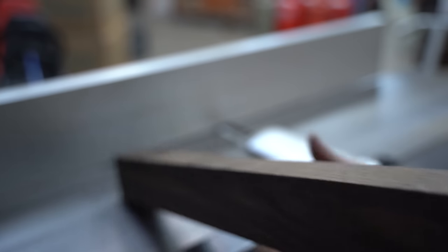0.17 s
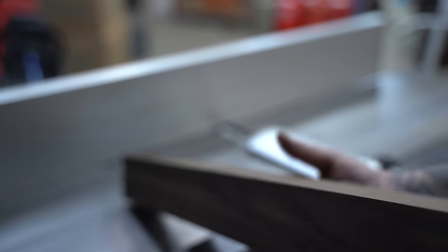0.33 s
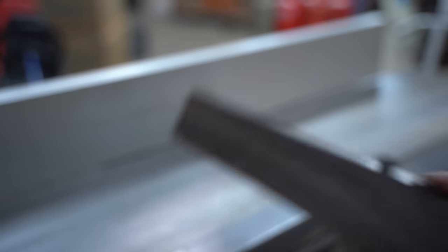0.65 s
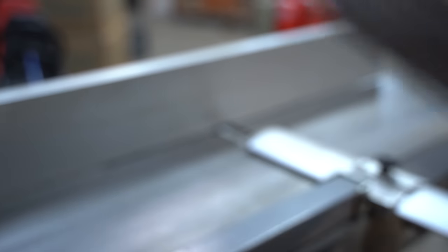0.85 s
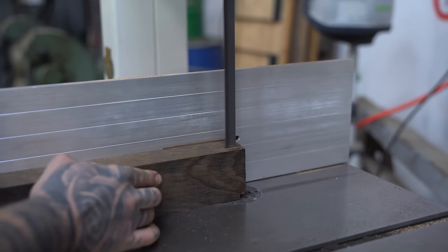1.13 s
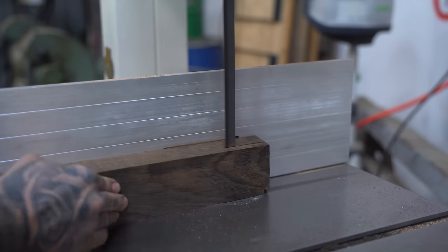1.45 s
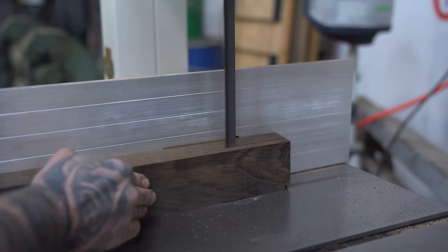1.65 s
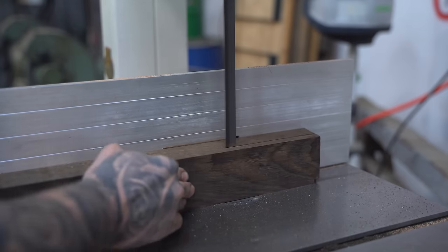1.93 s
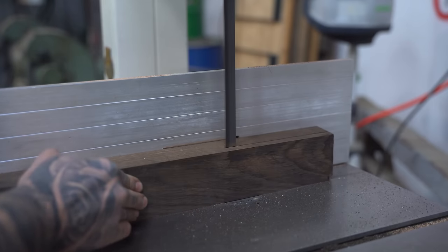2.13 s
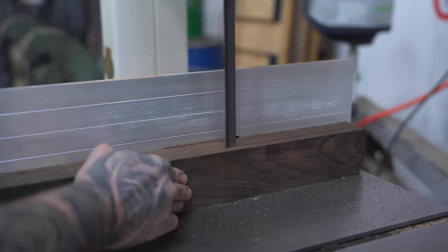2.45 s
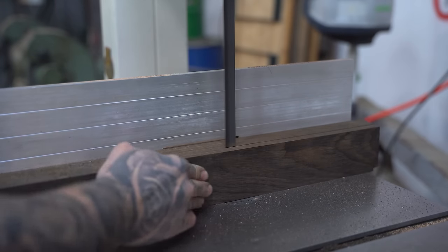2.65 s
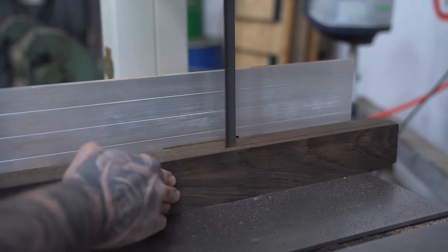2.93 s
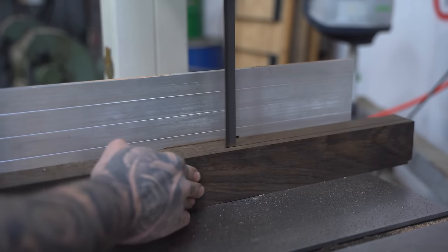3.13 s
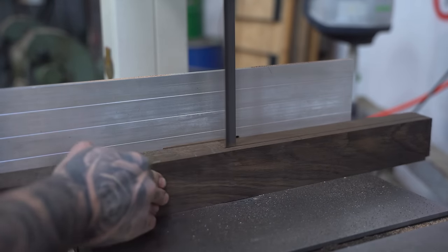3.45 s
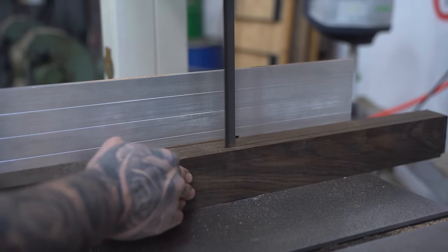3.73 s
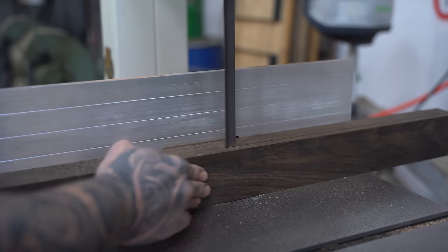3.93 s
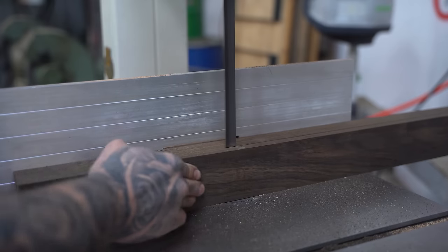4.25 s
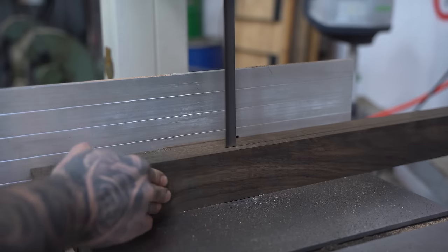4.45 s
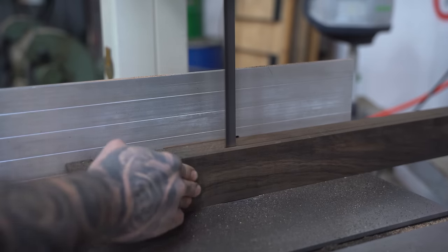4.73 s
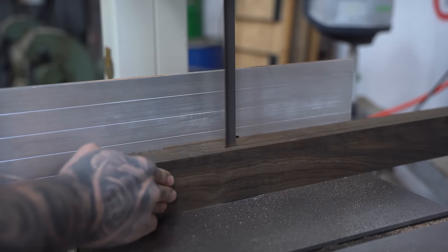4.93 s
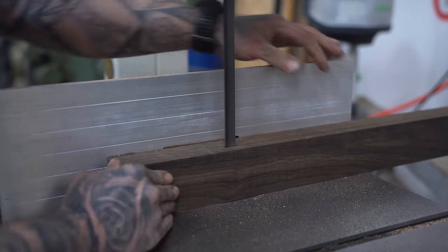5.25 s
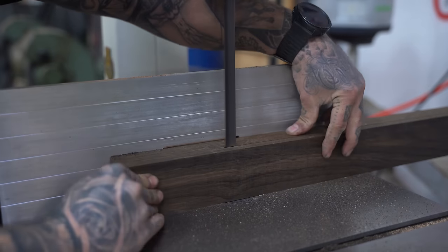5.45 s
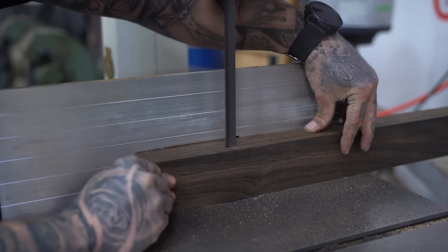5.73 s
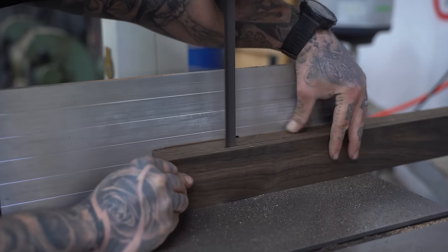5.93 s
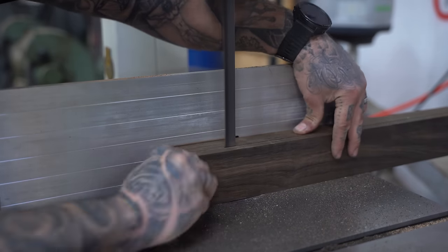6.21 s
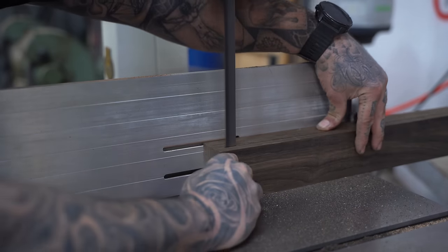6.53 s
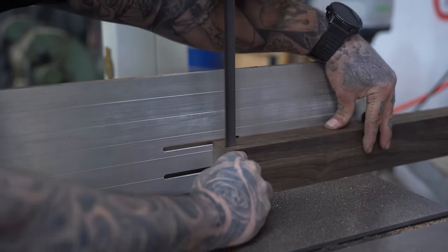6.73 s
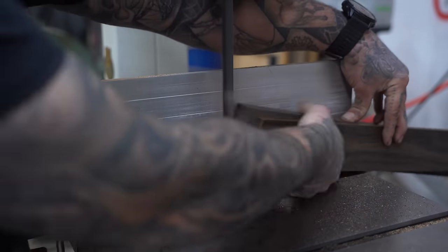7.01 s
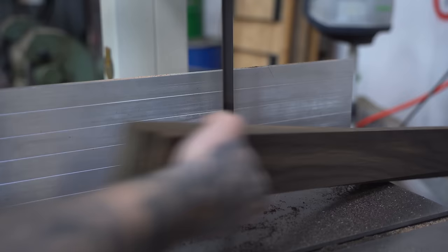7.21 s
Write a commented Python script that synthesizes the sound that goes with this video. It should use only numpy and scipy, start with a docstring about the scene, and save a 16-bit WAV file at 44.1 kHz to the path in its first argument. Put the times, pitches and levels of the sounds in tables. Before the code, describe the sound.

A jointer idles in a small workshop, a steady rush of air with a thin bearing whine, slightly to the left. At about 1.1 seconds the sound switches abruptly to a louder bandsaw ripping a hardwood board, close and roughly centred. The teeth make a bright, sizzling rasp with a fast flutter, ringing blade tones and a woody resonance underneath. Deeper bites squeal and growl from about 1.2 to 1.9 seconds, near 4.2, and again from 5.8 to 6.5. The rasp dips briefly between pushes, roughly every half second, often with a high metallic chirp; clear dips come near 1.5, 2.1, 2.7, 3.3 and 4.4 seconds, with a longer hesitation around 5.2 to 5.4. At about 6.8 seconds the cut is through, and the saw runs free with a quieter hiss and faint whine until the end, around 7.4 seconds.

```python
"""Bandsaw ripping hardwood

In a small workshop a jointer idles for a second; then, abruptly, a bandsaw is ripping a board.
The teeth rasp through the fibres and set the blade ringing: a light bite sizzles, a deep one squeals
and growls. Whenever the hand stops feeding, the rasp drops, often with a chirp from the blade.
Near the end the cut is through and the saw runs free."""
import sys
import numpy as np
from scipy import signal
from scipy.fft import rfft, irfft, next_fast_len
from scipy.io import wavfile
from scipy.ndimage import uniform_filter1d

SR = 44100
rng = np.random.default_rng(int(sys.argv[2]) if len(sys.argv) > 2 else 0)


def file_out(sig):
    """Save sig as 16-bit WAV at sys.argv[1]."""
    # one column per channel
    cols = np.atleast_2d(sig).T
    # limit, then scale
    lim = np.clip(cols, -1, 1)
    pcm = np.round(lim * 32767).astype(np.int16)
    wavfile.write(sys.argv[1], SR, pcm)


N = 325105
TIME = np.arange(N) / SR
SAW_START_S = 1.147
FREE_TOOTH_HZ, LOADED_TOOTH_HZ, PULLEY_HZ = 923, 892, 35.33

# The jointer's rush of air. Each row: frequency in Hz, relative level in dB.
JOINTER_AIR_COLOUR = [(30, -46), (75, -30), (100, -20), (150, -16), (310, -10), (600, -14), (1070, -16.5),
                      (1550, -17), (1800, -22), (3060, -21.5), (4000, -19), (5170, -19.5), (6210, -27),
                      (16000, -41)]
# Its stereo image. Each row: frequency in Hz, left-right likeness from 0 to 1.
JOINTER_STEREO = [(100, 1), (300, 1), (700, 0.86), (1400, 0.42), (3000, 0.21), (6000, 0.12), (15000, 0.17)]
# Its hood resonance swells. Each row: time in seconds, relative level in dB.
HOOD_SWELL = [(0.2, -68), (0.6, -55.5)]
# Its bearing whine. Each row: pitch in Hz, relative level in dB.
JOINTER_WHINES = [(1986, -66), (2019, -82), (2692, -65.5), (3973, -58), (4963, -69.5), (7940, -76)]
# The hand pushes the board on, then slackens. Each row: start, end, lean-in and ease-off in seconds,
# then in dB the feed drop in the pause after it, strength, and trims for squeal, whistle and sizzle.
HAND_PUSHES = [(1.123, 1.492, 0.0045, 0.063, -17, 1, 3.5, 1.0, -1),
               (1.498, 2.136, 0.037, 0.026, -12, -0.5, 0.5, -2, 0.5),
               (2.148, 2.728, 0.02, 0.021, -12.5, 0.5, -0.5, 1.5, -1.5),
               (2.749, 3.288, 0.019, 0.03, -13.5, 1.5, 0.5, 0, -5),
               (3.313, 3.799, 0.0033, 0.027, -14.5, 0.5, -1, -4, 0),
               (3.827, 4.015, 0.0031, 0.024, -6, -0.5, -1, -4.0, 1),
               (4.024, 4.407, 0.016, 0.033, -13.5, -0.5, -2.5, -3, -4),
               (4.422, 4.893, 0.016, 0.028, -13.5, 0, 2, 1, -1.5),
               (4.9, 5.163, 0.018, 0.021, -10, -0.5, 0, 1.5, 2.5),
               (5.241, 5.308, 0.009, 0.077, -21, 0.5, 1, 7.0, 4.5),
               (5.434, 5.923, 0.066, 0.038, -3, -3.5, 1, 4, 0.5),
               (5.946, 6.29, 0.03, 0.029, -18, -1, -1, -1.5, -6),
               (6.311, 6.83, 0.0082, 0.049, -27, 1, -6, -2, -4)]
# The teeth briefly dig deeper or ride lighter. Each row: centre and half-length in seconds,
# extra bite in dB, how far the squeal sags in Hz.
BITE_SURGES = [(1.28, 0.071, 11, 140.5), (1.388, 0.039, 13.5, -16.5), (1.67, 0.13, 18, 88),
               (1.88, 0.044, 12, -3), (2.3, 0.14, -3.5, -0.5), (2.62, 0.09, 2, 1), (2.854, 0.103, 3, -22),
               (3.16, 0.08, -1, -19), (4.16, 0.16, 12, 190), (5.119, 0.027, 10, 0.5),
               (5.683, 0.045, 6.5, -0.5), (5.857, 0.077, 16.5, 1.5), (6.068, 0.06, 18.5, -7),
               (6.36, 0.14, 17, 42.5), (6.728, 0.053, -17, -5)]
# The tone of snapping fibres. Each row: frequency in Hz, relative level in dB.
RASP_COLOUR = [(300, -41), (900, -27.5), (2000, -19), (3700, -4), (4500, -1.5), (6400, -0.5), (8700, 3.5),
               (9300, 3), (9900, 2), (10400, 7.5), (10900, 3.5), (11500, 5.5), (12400, 1), (16000, -1.5)]
# Stereo width of the mix: centred below 5 kHz, wider in the treble.
# Each row: frequency in Hz, left-right likeness from 0 to 1.
MIX_WIDTH = [(1000, 1), (2500, 1), (5000, 1), (5600, 0.69), (10500, 0.64), (15000, 0.46)]
# Reflections off the fence, table and frame. Each row: delay in seconds, gain in dB.
METAL_ECHOES = [(0.0013, -14.5), (0.0031, -12.5), (0.0058, -14.5)]
# Blade resonances, one list each for growl, squeal, shriek, whistle and sizzle.
# Each row: frequency in Hz, width in Hz, relative level in dB.
BLADE_MODES = [
    [(4430, 100, -15), (4530, 150, -8), (4970, 32, -5), (5120, 100, 1.5), (5450, 200, 1.5),
     (11200, 500, -7), (11580, 260, -3.5)],
    [(5720, 100, -15.5), (5705, 44, -4.5), (5838, 22, -6), (5850, 107, 4)],
    [(6780, 91, -6), (6990, 160, 2), (7350, 120, 4.5), (7500, 120, -1.5)],
    [(7830, 500, 3), (8100, 100, -6.5), (8300, 52, -3.5)],
    [(13100, 220, -6.5), (13880, 150, -2), (14020, 220, 1), (14800, 460, -11), (14800, 340, -0.5),
     (15700, 270, -4.5)],
]
# How those five follow the bite. Each pair: base level in dB, dB gained per dB of bite.
GROWL, SQUEAL, SHRIEK = (-52.5, 0.96), (-45.0, 0.95), (-42, -0.081)
WHISTLE, SIZZLE = (-40.5, -0.18), (-37.0, -0.31)
# Board, table and frame resonances. Each row: frequency in Hz, width in Hz, relative level in dB.
BODY_MODES = [(468, 39, -16), (802, 13, -24), (1081, 25, -4.5), (1191.6, 21, -5.5), (1259, 21, -9),
              (1497, 100, -15), (1720, 41, -2.5), (2007, 22, -17), (2320, 55, 0), (2580, 43, -0.5),
              (3092, 67, 2), (3320, 41, 0.5), (4297, 110, 3)]
# The noise that shakes them. Each row: frequency in Hz, relative level in dB.
BODY_NOISE_COLOUR = [(88, -79), (150, -44), (469, -22.5), (561, -35), (584, -24), (661, -20), (871, -29),
                     (1190, -8), (1730, -9), (1900, -15.5), (2510, -3.5), (4000, -9.5), (5200, -24.5),
                     (8800, -120)]
# Their level as the cut runs in and out. Each row: time in seconds, relative level in dB.
BODY_LEVEL = [(1.15, -54), (2.15, -51.5), (4.8, -51.5), (6.2, -51), (6.8, -57)]
# Where the rasp and blade sit. Each row: time in seconds, left over right in dB.
CUT_PAN = [(1.16, 0.5), (1.71, 0.0), (2.26, 1.5), (2.87, -0.5), (3.63, 0.0), (4.43, -0.5), (5.39, -2.5),
           (5.89, -1.5), (6.8, -3.0)]
# The band's hiss in its guides. Each row: frequency in Hz, relative level in dB.
BAND_HISS_COLOUR = [(35, -90), (60, -51), (238, -35.5), (458, -17), (553, -19), (593, -25), (682, -14.5),
                    (903, -8), (1660, -7), (2520, -4), (2900, -9.5), (4120, -8), (5460, -11.5), (8120, -8),
                    (16000, -19)]
# The saw's bearing whine. Each row: pitch in Hz, free-running level in dB.
SAW_WHINES = [(420, -86), (813, -83), (1265, -71.5), (1999, -68), (2363, -79.5), (2570, -64), (3994, -71.5),
              (8280, -75.5), (10121, -79.5), (11978, -84), (12150, -78), (15638, -77.5)]
# The blade chirps or sings in its guides.
# Each row: centre and half-length in seconds, pitch in Hz, level in dB.
BLADE_CHIRPS = [(1.463, 0.042, 1690, -53.5), (1.485, 0.094, 8340, -42), (1.55, 0.035, 7150, -31.5),
                (2.137, .06, 8500, -40.5), (2.14, .04, 1670, -53), (2.135, 0.027, 2573, -46.5),
                (2.15, 0.03, 2330, -51), (2.31, 0.063, 1780, -57), (2.46, 0.11, 8150, -35.5),
                (2.745, 0.062, 8330, -38.5), (3.285, 0.069, 8360, -45), (3.63, 0.074, 6980, -38.5),
                (4.34, 0.058, 6970, -40), (4.42, 0.042, 1675, -57), (4.91, 0.033, 1674, -54),
                (5.33, 0.032, 1664, -56), (5.42, 0.015, 8470, -44.5), (5.47, 0.1, 2580, -52.5),
                (5.47, 0.023, 7760, -42), (5.58, 0.14, 8130, -38.5), (5.72, 0.53, 1730, -57.5),
                (6.16, 0.17, 1714, -62), (6.205, 0.069, 7130, -39), (6.30, 0.037, 1738, -56),
                (6.296, 0.037, 2580, -56), (6.58, 0.15, 7150, -39), (6.68, 0.037, 2580, -60),
                (6.812, 0.032, 1720, -54), (6.818, 0.036, 2560, -60)]
# The board groans faintly as it slides on the table.
# Each row: centre and half-length in seconds, pitch in Hz, level in dB.
BOARD_GROANS = [(2.0, 0.088, 233, -91), (2.52, 0.1, 278.7, -87), (2.8, 0.16, 335.6, -81.5),
                (3.24, 0.14, 274.5, -83), (3.46, 0.0853, 301.5, -82), (4.11, 0.07, 230, -80.5)]


def from_db(db):
    """Decibels to gain."""
    return np.exp(np.asarray(db) * np.log(10) / 20)


def rms_one(x):
    """Scale to unit power."""
    return x / np.sqrt(np.mean(x ** 2) + 1e-20)


def in_time(points):
    """An automation curve, read at every sample."""
    return np.interp(TIME, *np.transpose(points))


def at_hz(points, hz):
    """Read a curve on a log-frequency axis."""
    f, value = np.transpose(points)
    return np.interp(np.log(hz), np.log(f), value)


def drift(rate_hz):
    """A random wander with a spread of 1."""
    knots = rng.standard_normal(4000)
    return np.interp(TIME * rate_hz, np.arange(4000), knots) * np.sqrt(3 / 2)


def hiss():
    """Two unrelated white noises."""
    return rng.standard_normal((2, N))


def coloured(x, spectrum, likeness=MIX_WIDTH):
    """EQ two noises and mix them as mid and side to set the stereo width; rms 1."""
    size = next_fast_len(N, True)
    hz = np.maximum(np.fft.rfftfreq(size, 1 / SR), 1)
    mid, side = rfft(x, size) * from_db(at_hz(spectrum, hz))
    alike = np.clip(at_hz(likeness, hz), 0, .999)
    side = side * np.sqrt((1 - alike) / (1 + alike))
    return rms_one(irfft([mid + side, mid - side], size)[:, :N])


def resonate(x, hz, width_hz):
    """Two like resonances in a row, so the skirts fall steeply; rms 1."""
    b, a = signal.iirpeak(min(hz, .45 * SR), hz / (1.5 * width_hz), fs=SR)
    return rms_one(signal.sosfilt([[*b, *a]] * 2, x))


def tone(hz, waver_hz):
    """A wavering sine of rms 1."""
    return np.sqrt(2) * np.sin(2 * np.pi * np.cumsum(hz + waver_hz * drift(40)) / SR)


def jointer(pan_db=2.0, lead_s=0.00015):
    """The cutter block churns air through its hood while the bearings whine, a little to the left."""
    air, churn = (coloured(hiss(), JOINTER_AIR_COLOUR, JOINTER_STEREO) for _ in range(2))
    hood = from_db(in_time(HOOD_SWELL) - 3.0) * resonate(churn, hz=392, width_hz=55)
    guard = from_db(-57.0) * resonate(churn, hz=1340, width_hz=280)
    whine = sum(from_db(db + 1.0 + 1.7 * drift(7.5)) * tone(hz, waver_hz=8.1)
                for hz, db in JOINTER_WHINES)
    left, right = from_db(-50.5) * air + hood + guard + whine
    right = np.roll(right, round(lead_s * SR))
    return np.array([left * from_db(pan_db / 2), right * from_db(-pan_db / 2)])


def feed_pressure():
    """The hand's pressure in dB: full during a push, easing off in the pause that follows."""
    start, end, lean_in, ease_off, drop_db = np.transpose(HAND_PUSHES)[:5]
    next_start = np.append(start[1:], TIME[-1])
    pauses = zip(end, np.maximum(end, next_start), ease_off, np.roll(lean_in, -1), drop_db)
    return sum(drop * np.interp(TIME, [stop - ease, stop, resume, resume + lean], [0, 1, 1, 0])
               for stop, resume, ease, lean, drop in pauses)


def push_character():
    """Strength, squeal, whistle and sizzle in dB: held through each push, gliding in the pauses."""
    start, end, _, _, _, *held = np.transpose(HAND_PUSHES)
    edges = np.column_stack([start, end]).ravel()
    return [np.interp(TIME, edges, np.repeat(column, 2)) for column in held]


def bite_and_sag(edge_db=-8, edge_s=0.04):
    """Depth of bite in dB, shallow at both ends of a push, and the squeal's sag in Hz."""
    to_edge_s = np.min([abs(TIME - edge) for push in HAND_PUSHES for edge in push[:2]], axis=0)
    centre, half_length, extra_db, sag_hz = np.transpose(BITE_SURGES)
    swells = np.exp(-np.minimum(((TIME[:, None] - centre) / half_length) ** 2, 20))
    return swells @ extra_db + edge_db * np.exp(-to_edge_s / edge_s), swells @ sag_hz


def tooth_force(tooth_hz, uneven_db=1.0, tooth_decay=0.21, throb_db=2.0):
    """Each tooth hits with its own strength; once per pulley turn the blade jerks into the wood."""
    teeth = np.cumsum(tooth_hz) / SR
    strength_db = uneven_db * rng.standard_normal(8000)[teeth.astype(int)]
    turn = (TIME * PULLEY_HZ) % 1
    jerk_db = throb_db * np.exp(-turn / 0.27) * (1 + .5 * drift(1.9))
    return rms_one(from_db(strength_db + jerk_db) * np.exp(-tooth_decay * (teeth % 1)))


def fibre_rasp(force, bite_db, feed_db, grain_db=4.0):
    """Fibres snap under the teeth in tiny grains; echoes off close metal comb the sound."""
    grains = np.repeat(rng.standard_normal(N // 8 + 1), 8)[:N]
    snaps = force * from_db(grain_db * grains)
    direct = coloured(hiss() * snaps, RASP_COLOUR)
    echoes = sum(from_db(db) * np.roll(direct, round(delay * SR), axis=1) for delay, db in METAL_ECHOES)
    return from_db(-39.0 + 0.2 * bite_db + 0.65 * feed_db) * rms_one(direct + echoes)


def ring(drive, modes, flicker_db):
    """One force drives a set of resonances, each flickering in level; rms 1."""
    return rms_one(sum(from_db(db + flicker_db * drift(PULLEY_HZ * 2)) * resonate(drive, hz, width)
                       for hz, width, db in modes))


def bend(x, shift_hz):
    """Slide a ringing sound up or down with a frequency shifter."""
    analytic = signal.hilbert(x, next_fast_len(N))[:, :N]
    return np.real(analytic * np.exp(2j * np.pi * np.cumsum(shift_hz) / SR))


def blade(force, bite_db, sag_hz, trims_db, feed_db, rest_hz=30.0, wander_hz=12.77, relax_hz=59.6):
    """The blade rings in five voices: a deep bite feeds the low ones and damps the high ones."""
    drive = coloured(hiss() * force, RASP_COLOUR)
    squeal_db, whistle_db, sizzle_db = trims_db
    laws = GROWL, SQUEAL, SHRIEK, WHISTLE, SIZZLE
    squeal_bite_db = np.minimum(bite_db, 6)   # past this bite the squeal grows no louder
    bites = bite_db, squeal_bite_db, bite_db, bite_db, bite_db
    flickers_db = 1.0, 1.0, 2.0, 1.5, 2.5
    growl, squeal, shriek, whistle, sizzle = (
        from_db(db + slope * depth) * ring(drive, modes, flicker)
        for modes, (db, slope), depth, flicker in zip(BLADE_MODES, laws, bites, flickers_db))
    squeal = bend(from_db(squeal_db) * squeal, rest_hz - sag_hz + wander_hz * drift(45))
    # shriek and whistle spring up in pitch as the feed eases
    upper = bend(shriek + from_db(whistle_db) * whistle, relax_hz * (1 - from_db(feed_db)))
    return growl + squeal + upper + from_db(sizzle_db) * sizzle


def board_and_frame(force, feed_db):
    """The body of the cut. The blade keeps rubbing in the kerf, so a pause only partly ducks it."""
    frame = from_db(-1.5) * ring(coloured(hiss(), BODY_NOISE_COLOUR), BODY_MODES, flicker_db=2.0)
    board = from_db(-4.5) * coloured(hiss() * force, BODY_NOISE_COLOUR)
    return from_db(in_time(BODY_LEVEL) + 0.66 * feed_db) * (frame + board)


def cut(tooth_hz, feed_db):
    """Teeth strike wood: heard directly as a rasp, and through the ringing blade, board and frame."""
    strength_db, *trims_db = push_character()
    bite_db, sag_hz = bite_and_sag()
    force = tooth_force(tooth_hz)
    rasp = fibre_rasp(force, bite_db, feed_db)
    ringing = from_db(feed_db) * blade(force, bite_db, sag_hz, trims_db, feed_db)
    pan_db = in_time(CUT_PAN)
    treble = (rasp + ringing) * from_db(strength_db + np.array([pan_db, -pan_db]) / 2)
    return treble + board_and_frame(force, feed_db)


def running_saw(tooth_hz, load, hum_hz=600.3):
    """The band hisses, the motor hums, the teeth whistle; the bearings whine a touch less under load."""
    air = from_db(-54.5) * coloured(hiss() * from_db(0.46 * drift(200)), BAND_HISS_COLOUR)
    whine = sum(from_db(db + 2.0 * drift(4.4)) * tone(hz, waver_hz=4.87) for hz, db in SAW_WHINES)
    hum = from_db(-75.0) * tone(hum_hz, waver_hz=0.84)
    octave = from_db(-75.5) * tone(2 * hum_hz, waver_hz=1.37)
    whistle = from_db(-73.0 + 3.4 * drift(45)) * tone(tooth_hz, waver_hz=2.84)
    return air + from_db(-0.5 * load) * whine + hum + octave + whistle


def stick_slip(rows, width_hz, rough, glide_hz_per_s, wobble_share):
    """Friction tones that swell and fade: a wobbling core with an unsteady, scraping edge."""
    out = np.zeros(N)
    wobble = wobble_share * drift(45)
    for centre, half_length, hz, db in rows:
        near = np.flatnonzero(abs(TIME - centre) < 1.6 * half_length)
        t = TIME[near] - centre
        knots = rng.standard_normal((2, 600)) / np.sqrt(2)
        scrape = np.interp((t - t[0]) * width_hz, np.arange(600), knots[0] + 1j * knots[1])
        swell = from_db(db) * np.exp(-2 * (t / half_length) ** 2)
        turns = np.cumsum(hz * (1 + wobble[near]) + glide_hz_per_s * t) / SR
        rub = np.real((1 + rough * scrape) * np.exp(2j * np.pi * turns))
        out[near] += swell * np.sqrt(2) * rub / np.hypot(1, rough)
    return out


def scene():
    """A hard cut from the jointer to the saw, whose band slows a little under load."""
    feed_db = feed_pressure()
    load = uniform_filter1d(from_db(feed_db), size=SR // 2)   # the heavy wheels change speed slowly
    tooth_hz = FREE_TOOTH_HZ + (LOADED_TOOTH_HZ - FREE_TOOTH_HZ) * load
    chirps = stick_slip(BLADE_CHIRPS, width_hz=120, rough=1.4, glide_hz_per_s=-21.5, wobble_share=0.0055)
    groans = stick_slip(BOARD_GROANS, width_hz=41, rough=1.8, glide_hz_per_s=140, wobble_share=0.01)
    saw = cut(tooth_hz, feed_db) + running_saw(tooth_hz, load) + chirps + groans
    return np.where(TIME < SAW_START_S, jointer(), saw)


def record(dry):
    """A steep low-pass takes off the very top."""
    return signal.sosfilt(signal.ellip(12, .1, 80, 15900, fs=SR, output="sos"), dry)


dry = scene()
out = record(dry)
file_out(out)
```